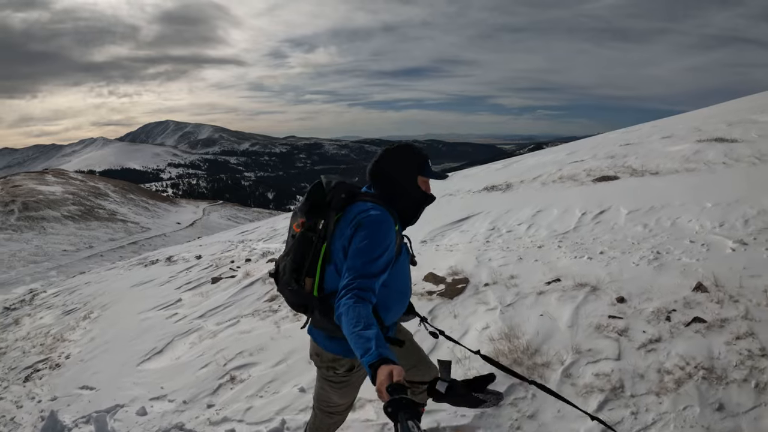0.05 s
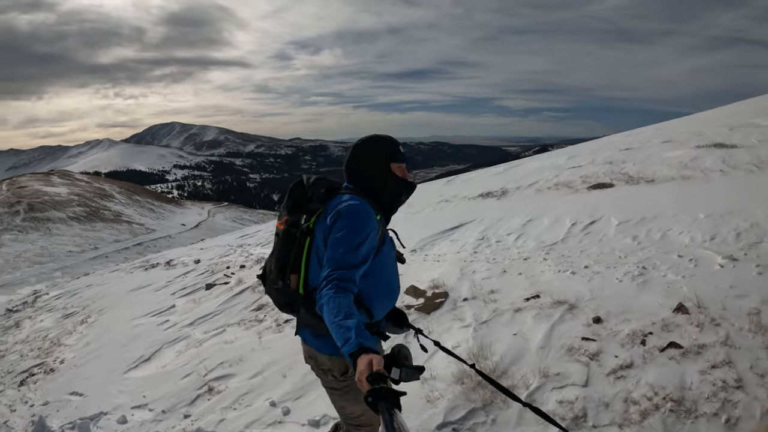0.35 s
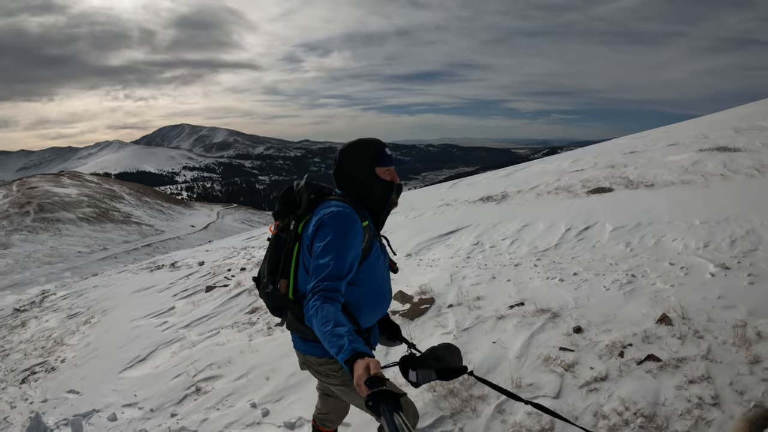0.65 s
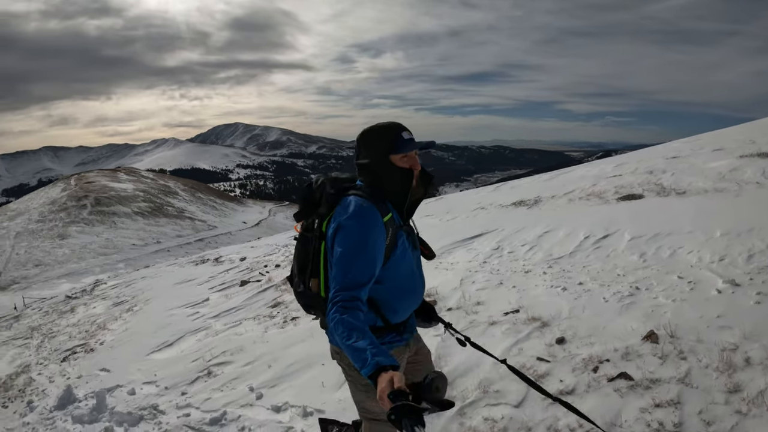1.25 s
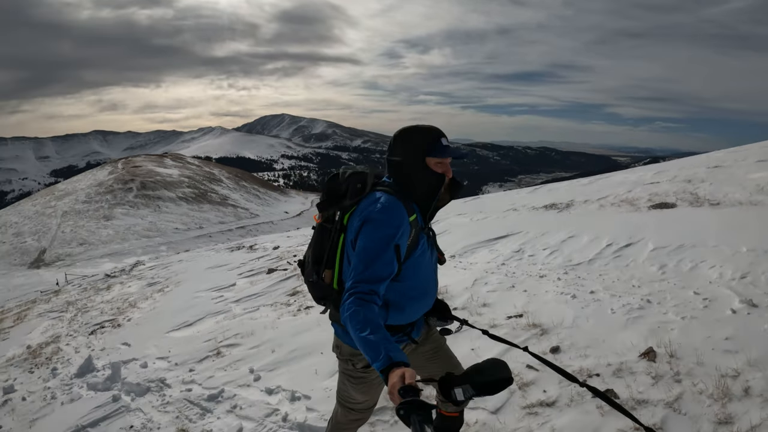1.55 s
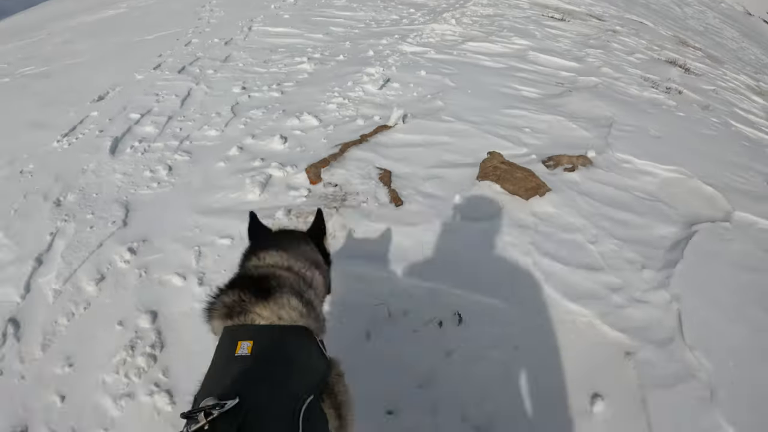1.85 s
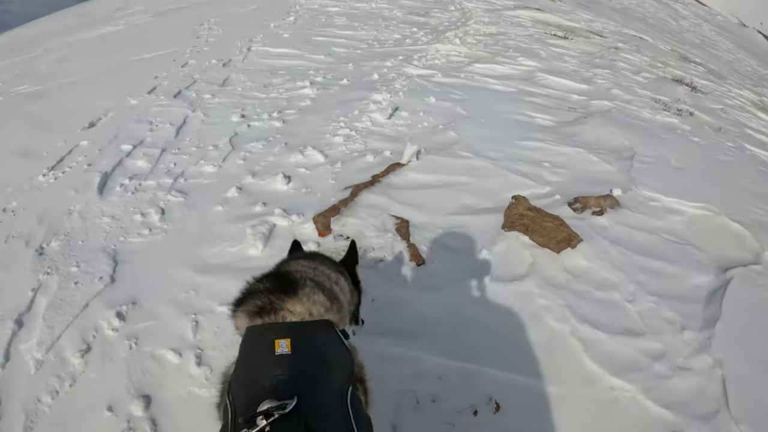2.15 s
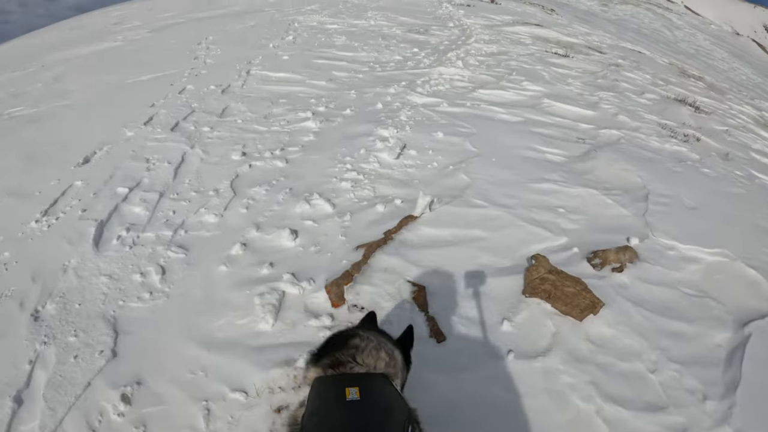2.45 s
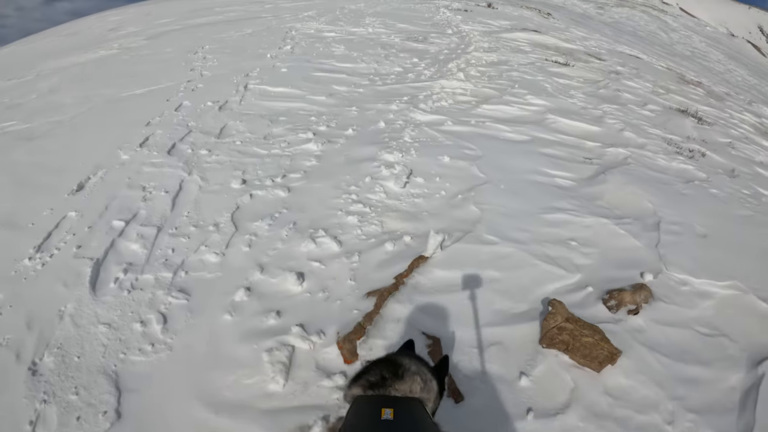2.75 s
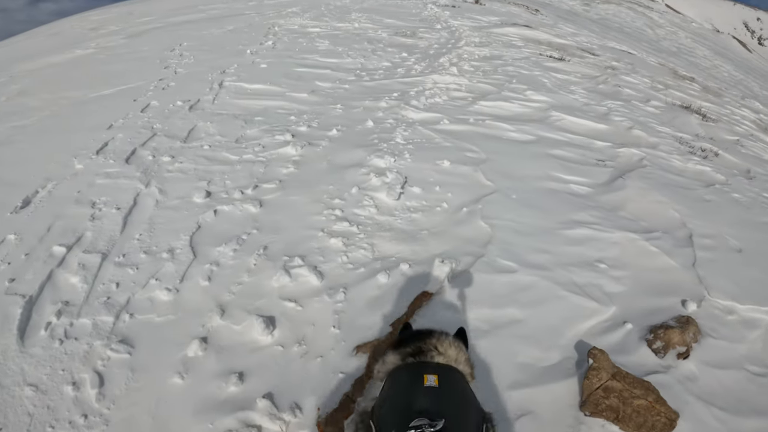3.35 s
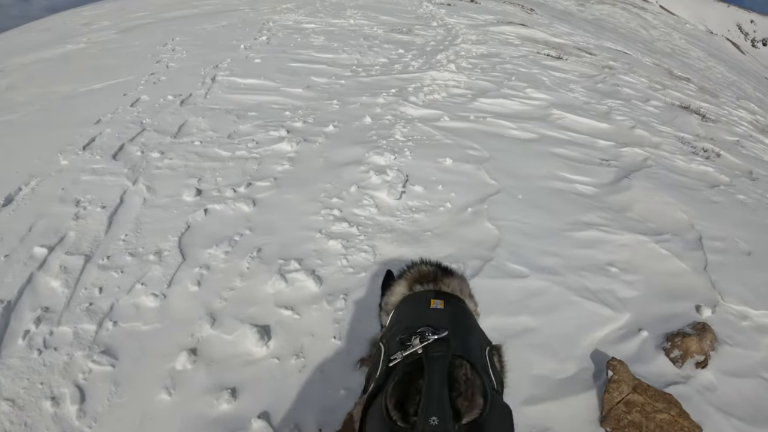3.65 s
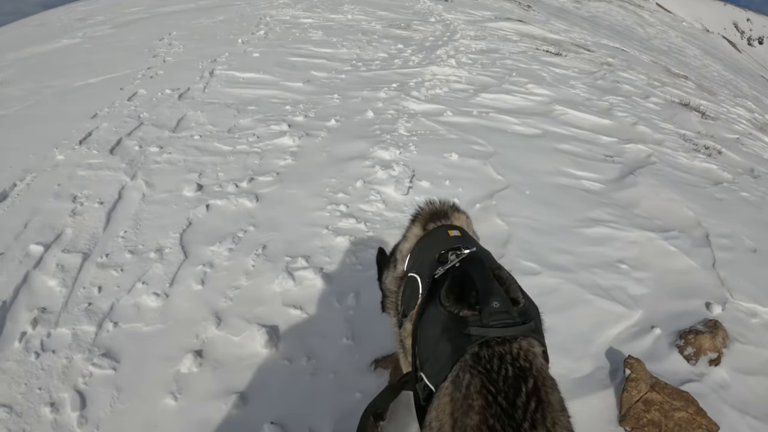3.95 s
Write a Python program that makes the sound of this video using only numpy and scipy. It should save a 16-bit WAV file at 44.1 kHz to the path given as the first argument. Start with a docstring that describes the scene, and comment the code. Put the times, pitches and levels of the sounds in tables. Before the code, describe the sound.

Footsteps crunch through crusty snow while wind buffets the microphone.

```python
"""Boots and paws cross wind-packed snow on an open mountain slope, close to a hand-held camera.
From the start, strong wind buffets the microphone and loose gear rattles. Steps break the crust, each
a swarm of tiny fractures; a pole tip ticks and loose snow scuffs in between. A gust swishes at 0.9 s.
Near 1.9 s comes one dry click and the wind turns lighter. The steps go on, now with a faint sizzle of
sliding crystals and hollow knocks where the crust is punched through."""
import sys
import numpy as np
from scipy import signal
from scipy.fft import rfft, irfft
from scipy.io import wavfile
from scipy.ndimage import uniform_filter1d, minimum_filter1d

SR = 44100
rng = np.random.default_rng(int(sys.argv[2]) if len(sys.argv) > 2 else 0)


def materialize(psi):
    """Save the field psi as 16-bit PCM at rate SR to the path in sys.argv[1].

    A 1-D psi becomes a single channel; in a 2-D psi each row is a channel.
    """
    bounded = np.clip(np.atleast_2d(psi).T, -1, 1)
    quanta = np.round(bounded * 32767).astype(np.int16)
    wavfile.write(sys.argv[1], SR, quanta)


N = 176400


def undb(db):
    """Decibels to gain."""
    return 10 ** (np.asarray(db) / 20)


def rms(x):
    """Average signal strength."""
    return np.sqrt(np.mean(x ** 2) + 1e-18)


def unit(x):
    """Scale to rms 1."""
    return x / rms(x)


def colour(x, eq, tilt=0):
    """Apply an EQ curve, tilted in dB per octave for two octaves either side of 2 kHz; rms 1."""
    hz = np.maximum(np.arange(len(x) // 2 + 1) * SR / len(x), 1)
    eq_hz, eq_db = np.array(eq, float).T
    octaves = np.clip(np.log2(hz / 2000), -2, 2)
    gain_db = np.interp(np.log(hz), np.log(eq_hz), eq_db) + tilt * octaves
    return unit(irfft(rfft(x) * undb(gain_db), len(x)))


def resonate(x, hz, width_hz):
    """Two-pole resonance."""
    return signal.lfilter(*signal.iirpeak(hz, hz / width_hz, fs=SR), x)


def cut(x, hz, kind, order):
    """Low-pass or high-pass."""
    return signal.sosfilt(signal.butter(order, hz, kind, fs=SR, output="sos"), x)


def wander(per_s, n):
    """Smooth random drift with a spread near 1."""
    stride = max(int(SR / per_s), 1)
    knots = rng.standard_normal(4096)
    return np.sqrt(1.5) * np.interp(np.arange(n) / stride, np.arange(len(knots)), knots)


def envelope(t, attack_s, hold_s, release_s):
    """Exponential rise to time 0, hold, exponential fall."""
    rise = np.minimum(t, 0) / max(attack_s, 1e-4)
    fall = np.maximum(t - hold_s, 0) / max(release_s, 1e-4)
    return np.exp(rise - fall)


def add(out, start_s, x):
    """Mix x in from start_s."""
    i = int(round(start_s * SR))
    a, b = max(i, 0), min(i + len(x), N)
    out[a:b] += x[a - i:b - i]


def event_time():
    """Seconds around one hit, with room for its attack before 0."""
    return np.arange(-8192, 40960) / SR


def crackle(n, spread_db=3, snaps_per_s=6000):
    """Random snaps, as of ice bonds breaking: many small, a few large, bunched in little avalanches."""
    snaps = rng.random(n) < snaps_per_s / SR
    size_db = spread_db * np.minimum(rng.exponential(size=n), 5)
    bunching_db = 1.2 * wander(240, n)
    return snaps * rng.choice([-1., 1.], n) * undb(size_db + bunching_db)


# EQ of the mic rumble, the strong wind's rush and the light wind's rush: freq_hz, gain_db
RUMBLE_EQ = [(15, 0), (36, 0), (66, -1.5), (98, -4.5), (128, -5), (200, -10), (290, -17), (420, -25),
             (550, -49)]
GALE_EQ = [(250, -28.5), (420, 3), (560, 1), (900, -7.5), (1400, -10), (2200, -12.5), (3100, -16.5),
           (4300, -24), (6000, -32), (7200, -36.5), (8500, -48), (14000, -66.5)]
BREEZE_EQ = [(250, -4.5), (420, 7.5), (600, 2), (900, -6.5), (1400, -13.5), (2200, -19), (3100, -20),
             (4500, -26), (6600, -28), (7500, -38), (8500, -48.5), (14000, -67.5)]
# Fader rides on the rumble's two bands, ahead of their trims: time_s, buffet_db, low_mid_db
RUMBLE_RIDE = [(0.06, -18, -27), (0.29, -24, -32), (0.33, -17.5, -23), (0.7, -19.5, -24.5),
               (1.14, -18.5, -25.5), (1.23, -20, -30), (1.51, -24.5, -35.5), (1.69, -21, -30.5),
               (1.86, -18, -32), (1.92, -29, -31.5), (2.08, -28.5, -36.5), (2.43, -29.5, -32.5),
               (2.75, -24, -30.5), (2.83, -30, -29.5), (3.11, -24.5, -34), (3.2, -27.5, -34),
               (3.29, -23, -30.5), (3.97, -25, -33)]
# Fader rides on the strong and the light rush: time_s, level_db
GALE_RIDE = [(0, -40.5), (.2, -38.5), (.29, -44.5), (.34, -37), (.7, -40), (.85, -38.5), (1.12, -37),
             (1.25, -42.5), (1.7, -41), (1.87, -44.5), (1.91, -78)]
BREEZE_RIDE = [(1.8, -64), (1.89, -39), (1.95, -44.5), (2.3, -41), (2.75, -42.5), (3.05, -44), (3.4, -39),
               (3.62, -43.5), (4, -37.5)]
def wind(split_hz=149, buffet_trim_db=2, low_mid_trim_db=0.5):
    """Eddies buffet the microphone port; a fluttering rush of air rides on top."""
    def ride(points, column=1):
        points = np.array(points)
        return undb(np.interp(np.arange(N) / SR, points[:, 0], points[:, column]))

    def air(eq):
        return colour(rng.standard_normal(N), eq)

    eddies = wander(70, N)
    lows = cut(air(RUMBLE_EQ), split_hz, "low", order=6)
    lows = cut(lows, 15.5, "high", order=2)
    buffet = unit(lows * undb(0.5 * wander(25, N))) * ride(RUMBLE_RIDE)
    band = cut(air(RUMBLE_EQ), split_hz, "high", order=6)
    band = cut(band, 401, "low", order=6)
    low_mids = unit(band * undb(1.5 * eddies)) * ride(RUMBLE_RIDE, column=2)
    gale = air(GALE_EQ) * ride(GALE_RIDE) * undb(1.7 * eddies)
    breeze = air(BREEZE_EQ) * ride(BREEZE_RIDE) * undb(2 * eddies + wander(15, N))
    return undb(buffet_trim_db) * buffet + undb(low_mid_trim_db) * low_mids + gale + breeze


def hard_contact(snaps, hz, q=0.98):
    """Dry tone for gear and pole: a broad resonance, reshaped by a brightened crust EQ; rms 1."""
    return colour(resonate(snaps, hz, hz / q), CRUST_EQ, tilt=1)


# Shakes of loose gear: start_s, level_db
GEAR_RATTLES = [(.028, -37.5), (0.586, -51.5), (1.185, -47), (1.384, -38), (3.822, -45)]
def gear_rattles(resonance_hz=7800, decay_s=0.0077):
    """A buckle or strap fastener chatters in a quickly fading run of bright contacts."""
    out, t = np.zeros(N), event_time()
    for at, db in GEAR_RATTLES:
        chatter = hard_contact(crackle(len(t)), resonance_hz)
        add(out, at + t[0], undb(db) * envelope(t, 0, 0, decay_s) * chatter)
    return out


# EQ of hard snow crust: freq_hz, gain_db
CRUST_EQ = [(150, -16), (350, 3.5), (620, 2.5), (1000, -3.5), (1550, 1.5), (2200, -1.5), (3100, -2),
            (4500, -6.5), (6600, -12.5), (7400, -23), (8500, -35.5), (11000, -34), (12500, -41.5),
            (14000, -62)]
# Crust giving way underfoot:
# full_load_s, build_s, hold_s, level_db, tilt_db_per_octave, slab_hz, slab_lift_db
CRUST_CRUNCHES = [(.121, 0.0038, 0.017, -32, 0.5, 3300, 2), (0.147, 0.0099, 0.014, -29.5, 0, 2400, 0),
                  (0.759, 0.0037, 0.02, -38.5, 2, 2750, 11), (0.910, 0.0013, 0.017, -33.5, -0.5, 2870, 13),
                  (.936, 0.02, 0.02, -30, -1, 1950, 7), (1.594, .003, 0.0046, -30.5, 3, 1800, 12.5),
                  (1.669, 0.016, 0.013, -29.5, 1.5, 2280, 2.5),
                  (1.798, 0.0062, 0.011, -34.5, -1.5, 2340, 9), (2.09, .002, 0.0067, -35.5, 1, 750, 18),
                  (2.147, 0.01, 0.011, -26, -.5, 1600, 1), (2.156, 0.026, 0.021, -37.5, -1.5, 3100, 5),
                  (2.238, .001, .004, -34, -0.5, 3000, 8), (2.254, 0.0063, 0.0053, -29.5, -0.5, 2780, 10),
                  (2.979, 0.0083, 0.041, -33.5, -3.5, 3270, 9.5),
                  (3.036, 0.017, 0.032, -28, -2.5, 1460, -7), (3.077, 0.019, 0.029, -31, -2, 3320, 4.5),
                  (3.16, 0.0054, .012, -40.5, 2, 1200, 7), (3.189, 0.0044, 0.022, -34, -1, 1300, -3),
                  (3.234, 0.0054, 0.015, -32.5, -1, 1700, 2), (3.286, 0.0048, 0.023, -31.5, -1, 1180, 5.5),
                  (3.392, 0.003, .012, -35.5, -2, 1660, -2),
                  (3.423, 0.0043, 0.0093, -35.5, -4.5, 1400, 3.5),
                  (3.77, 0.0059, 0.0047, -31.5, 1, 6140, 5), (3.783, 0.0044, 0.01, -32.5, -1, 1600, 0),
                  (3.843, 0.001, 0.0024, -35, 2.5, 2000, 3), (3.898, 0.017, 0.024, -26, -1, 2860, 3),
                  (3.934, 0.0099, 0.0089, -35.5, 0.5, 6300, 2)]
def crunches(slab_q=4.7, release_s=0.0066):
    """The crust loads up, crumbles and settles, its fractures ringing the slab."""
    out, t = np.zeros(N), event_time()
    for at, build, hold, db, tilt, hz, lift_db in CRUST_CRUNCHES:
        snaps = crackle(len(t))
        slab = (undb(lift_db) - 1) * resonate(snaps, hz, hz / slab_q)
        crunch = colour(snaps + shards(snaps) + slab, CRUST_EQ, tilt)
        add(out, at + t[0], undb(db) * envelope(t, build, hold, release_s) * crunch)
    return out


def shards(snaps, count=10, low_hz=606, high_hz=7130):
    """Each break frees a few plates of crust that ring briefly at pitches of their own."""
    positions = (np.arange(count) + rng.random(count)) / count
    pitches = low_hz * (high_hz / low_hz) ** positions
    return undb(-2) * sum(resonate(snaps, hz, width_hz=75) for hz in pitches)


# Pole tip and hard crust cracking: start_s, level_db, resonance_hz
POLE_TICKS = [(0.167, -23.5, 1500), (0.941, -20, 2400), (0.903, -28, 2970), (2.346, -31, 2300),
              (3.056, -16.5, 1880), (3.407, -35, 2400), (3.849, -33, 2000), (3.895, -19, 2820),
              (3.920, -29, 2000)]
def pole_ticks(decay_s=0.0017):
    """Hard, dry contacts that die within a few milliseconds."""
    out, t = np.zeros(N), event_time()
    for at, db, hz in POLE_TICKS:
        tap = envelope(t, decay_s / 2, 0, decay_s)
        tick = hard_contact(tap * crackle(len(t)), hz)
        add(out, at + t[0], undb(db) * rms(tap) * tick)
    return out


# EQ of loose snow: freq_hz, gain_db
POWDER_EQ = [(200, -15), (600, -6.5), (1100, -5.5), (1500, 0.5), (2300, -1), (3100, -1.5), (4500, -5),
             (6600, -11), (7500, -21.5), (8500, -30.5), (12000, -35), (14000, -62.5)]
# Drags through loose snow: start_s, hold_s, level_db, tilt_db_per_octave
SNOW_SCUFFS = [(0.185, 0.006, -38.5, -4.5), (0.281, 0.0056, -43, -3.5), (0.789, 0.096, -48, 1.5),
               (1.029, 0.17, -51.5, -0.5), (1.609, 0.036, -47.5, 1), (1.701, .045, -41.5, -3),
               (1.767, 0.1, -44.5, -3.5), (1.983, 0.084, -47, -0.5), (2.102, 0.12, -45.5, -1.5),
               (2.268, 0.014, -39, -2.5), (2.298, 0.026, -41, -5), (2.423, 0.05, -47, -2.5),
               (2.645, 0.028, -52, -0.5), (2.808, 0.023, -42.5, -6), (2.924, 0.035, -51.5, -1.5),
               (3.115, 0.19, -43, -7.5), (3.322, 0.083, -45, -10.5), (3.439, 0.07, -48.5, -5),
               (3.965, .04, -38.5, -5)]
def scuffs(fade_s=0.011):
    """A sole or leg drags loose snow in a softer, more even crackle."""
    out, t = np.zeros(N), event_time()
    for at, hold, db, tilt in SNOW_SCUFFS:
        powder = colour(crackle(len(t), spread_db=2), POWDER_EQ, tilt)
        add(out, at + t[0], undb(db) * envelope(t, fade_s, hold, fade_s) * powder)
    return out


def gust_swish(start_s=0.9, hold_s=0.14, pitch_hz=3050, fall_hz_per_s=1700, width_hz=280):
    """A faint, narrow band of eddies, as off a pole or strap, sinks in pitch as the air slows."""
    t = np.arange(N) / SR - start_s
    hz = pitch_hz - fall_hz_per_s * t
    flutter = cut(rng.standard_normal(N), width_hz / 2, "low", order=2)
    swish = unit(flutter * np.sin(2 * np.pi * np.cumsum(hz) / SR))
    return undb(-51.5) * envelope(t, hold_s / 2, hold_s, hold_s / 2) * swish


def dry_click(start_s=1.8838, level_db=-25, decay_s=0.0004):
    """One bright, sharp-edged pulse as the wind drops."""
    t = np.arange(N) / SR - start_s
    return undb(level_db) * (t >= 0) * envelope(t, 0, 0, decay_s)


# EQ of sliding ice crystals: freq_hz, gain_db
CRYSTAL_EQ = [(8000, -33), (9500, -7), (11200, -9), (12200, 2), (13200, -2), (14500, -16), (15500, -41)]
# Spills of crystals: start_s, hold_s, level_db
CRYSTAL_SIZZLES = [(2.08, 0.83, -84), (2.529, .005, -71), (2.792, 0.01, -60), (2.81, 0.026, -69),
                   (2.93, 0.07, -74), (3.022, 0.078, -66), (3.160, .005, -59), (3.188, 0.11, -73)]
def sizzles():
    """Crystals slide over the crust with a thin, icy sizzle."""
    out, t = np.zeros(N), event_time()
    for at, hold, db in CRYSTAL_SIZZLES:
        fade_s = 0.19 * hold
        crystals = colour(crackle(len(t), spread_db=2.5), CRYSTAL_EQ)
        add(out, at + t[0], undb(db) * envelope(t, fade_s, hold, fade_s) * crystals)
    return out


# Slabs of crust punched through: start_s, hold_s, level_db, hollow_hz, grit_mix_db
CRUST_PUNCHES = [(2.123, 0.0032, -30.5, 830, -15), (2.145, 0.0037, -33.5, 1390, 4),
                 (2.318, 0.0037, -31, 555, -11.5), (2.530, 0.0031, -40.5, 1020, 6),
                 (2.793, 0.0077, -28.5, 1000, -1.5), (3.056, 0.0007, -18.5, 744, -9),
                 (3.763, .008, -28.5, 796, -7)]
def punches(attack_s=0.0015, release_s=0.0022, width_hz=600):
    """A short burst of fractures rings the hollow under the crust."""
    out, t = np.zeros(N), event_time()
    for at, hold, db, hz, grit_db in CRUST_PUNCHES:
        push = envelope(t, attack_s, hold, release_s)
        grit = push * colour(crackle(len(t)), CRUST_EQ, tilt=0.28)
        hollow = resonate(resonate(grit, hz, width_hz), hz, width_hz)
        knock = unit(hollow) + undb(grit_db) * unit(grit)
        add(out, at + t[0], undb(db) * rms(push) * knock)
    return out


def scene():
    """A mono mix, everything close and dry on the open slope."""
    mix = wind() + gear_rattles() + crunches() + pole_ticks() + scuffs()
    mix += gust_swish() + dry_click() + sizzles() + punches()
    return mix[None]


def record(dry):
    """The camera's limiter eases down the strongest buffets; the top is cut."""
    limit_db, top_hz, window_samples = -8.8, 16000, 881
    gain = 1 / (1 + (np.abs(dry) / undb(limit_db)) ** 6) ** (1 / 6)  # soft knee
    held_gain = minimum_filter1d(gain, window_samples)
    smooth_gain = uniform_filter1d(held_gain, window_samples)
    high_cut = signal.ellip(8, .2, 70, top_hz, fs=SR, output="sos")
    return signal.sosfilt(high_cut, dry * smooth_gain)


dry = scene()
out = record(dry)
materialize(out)
```